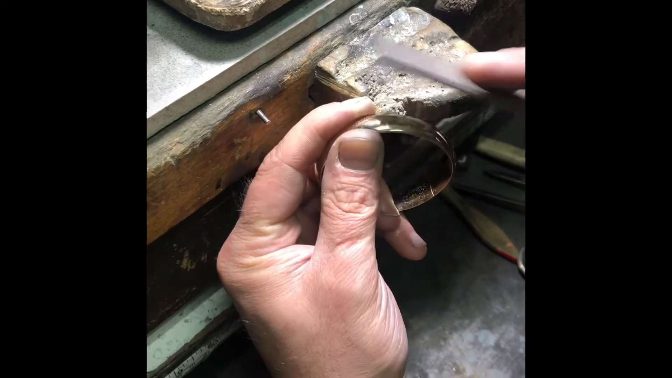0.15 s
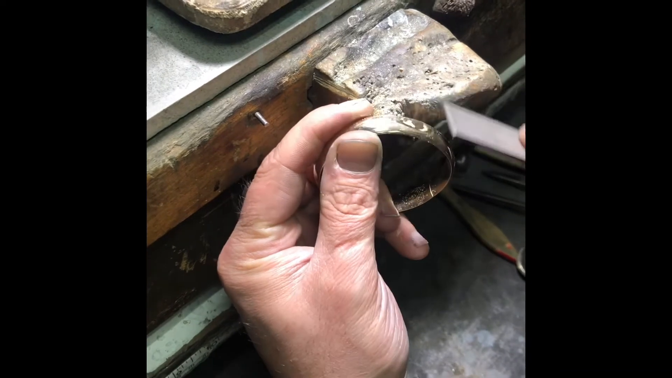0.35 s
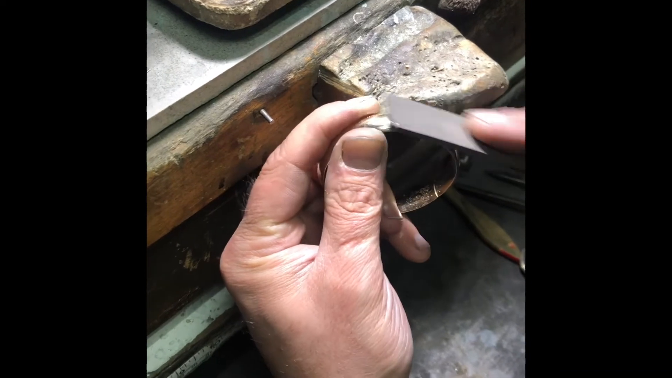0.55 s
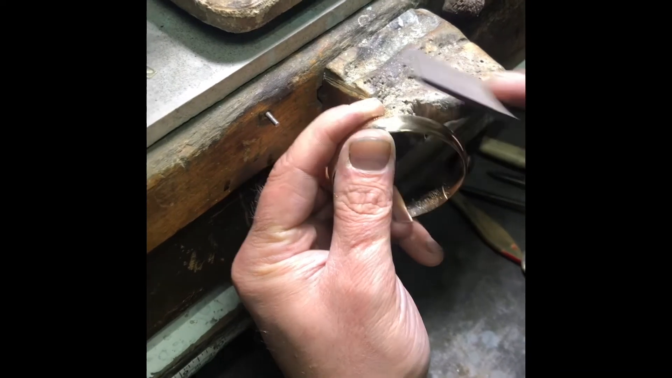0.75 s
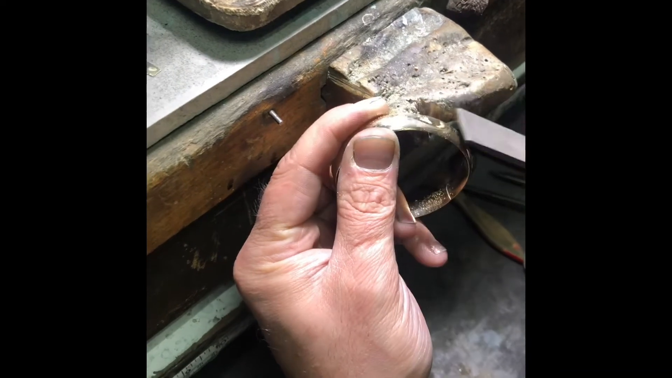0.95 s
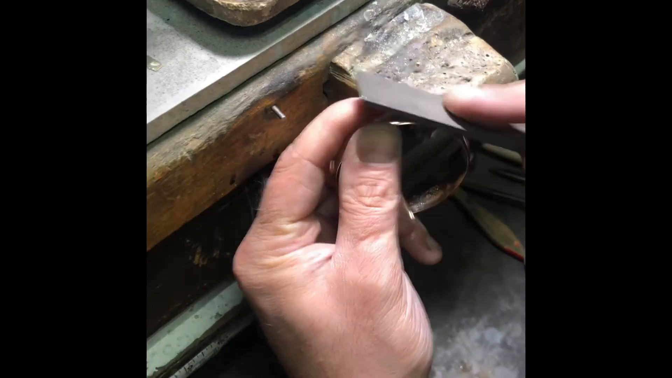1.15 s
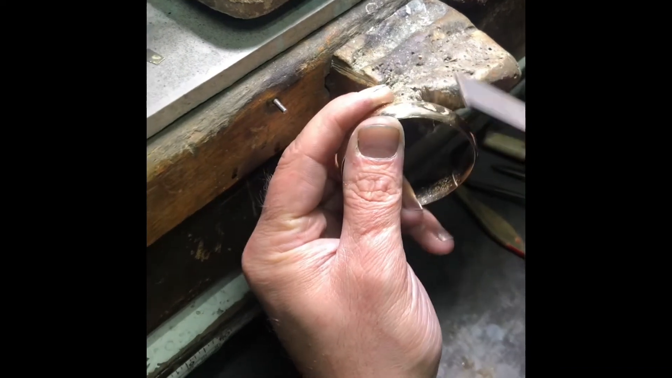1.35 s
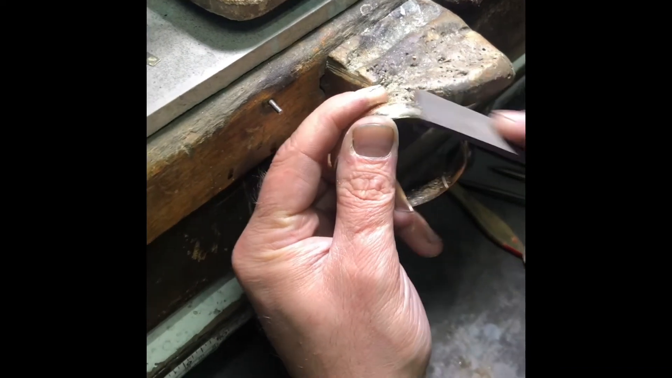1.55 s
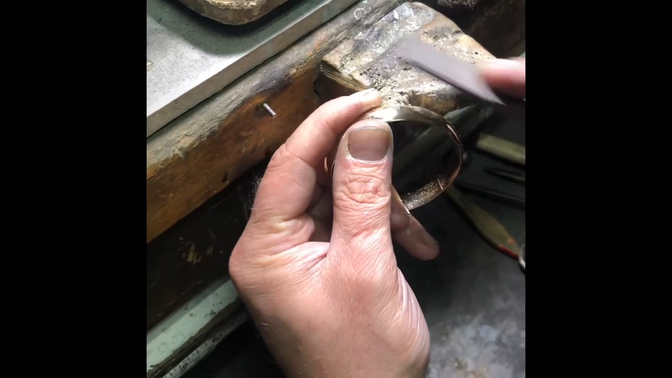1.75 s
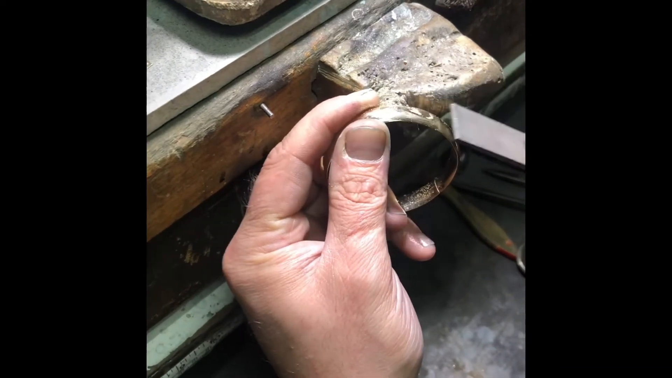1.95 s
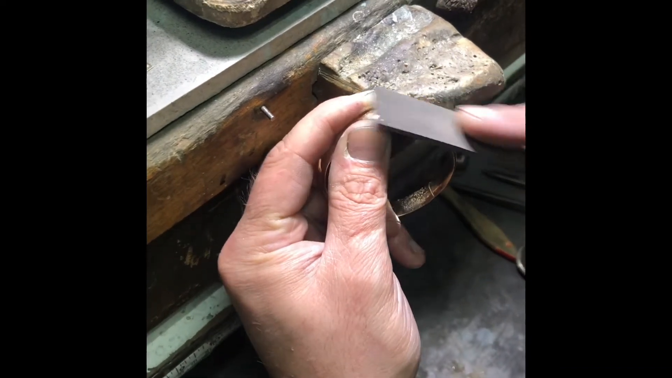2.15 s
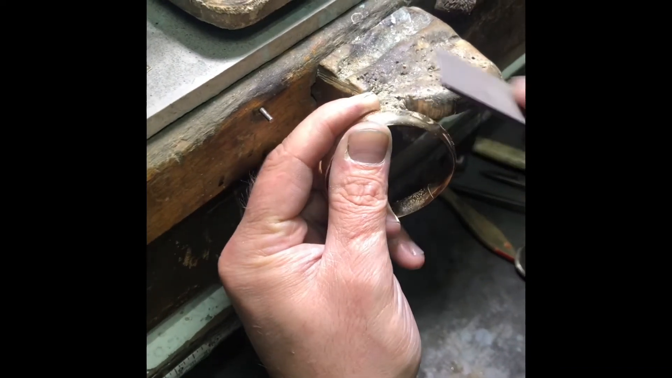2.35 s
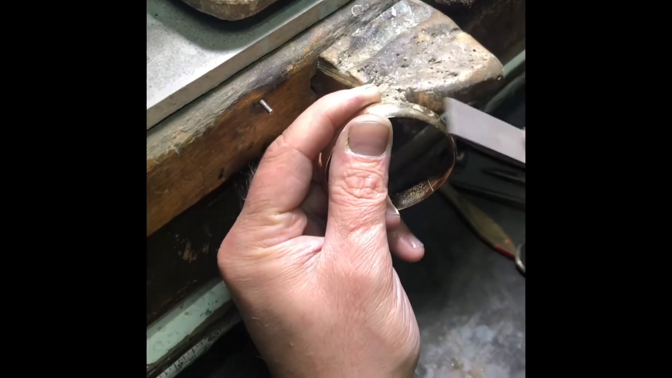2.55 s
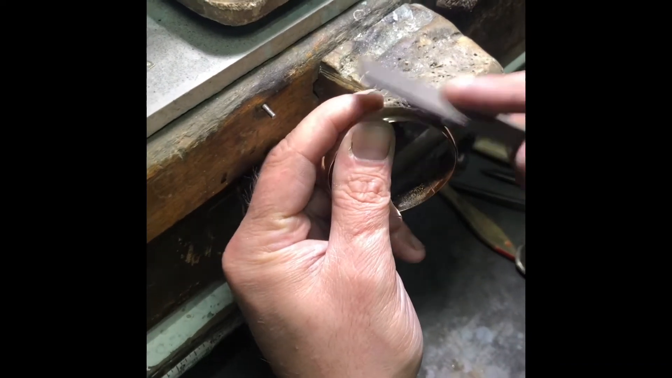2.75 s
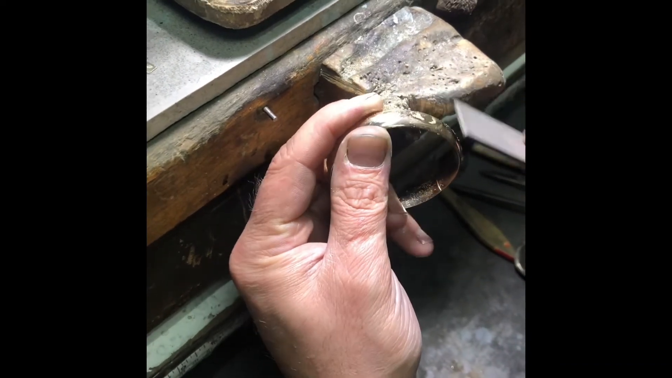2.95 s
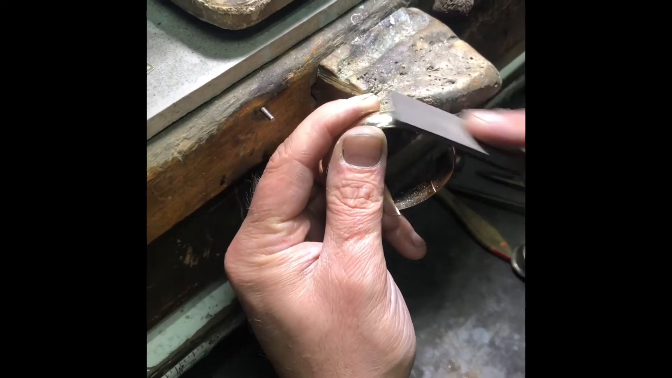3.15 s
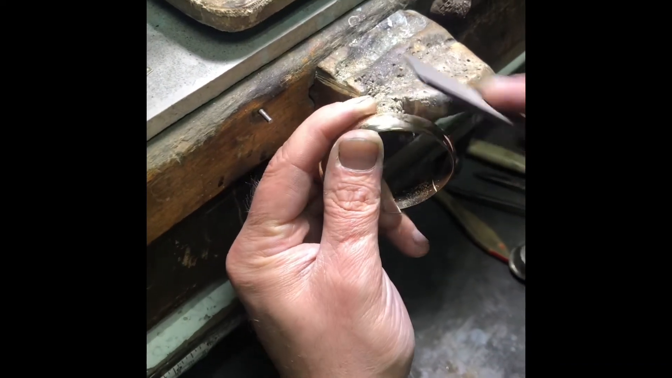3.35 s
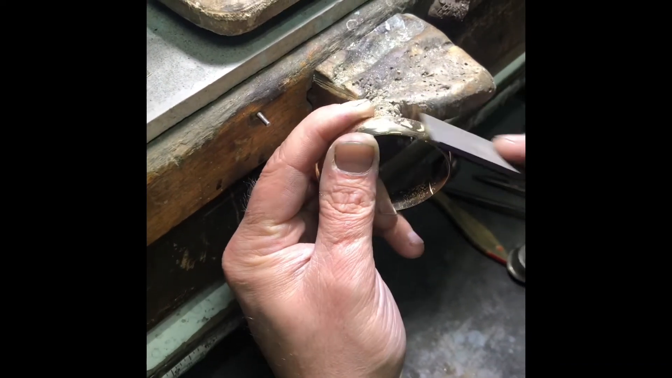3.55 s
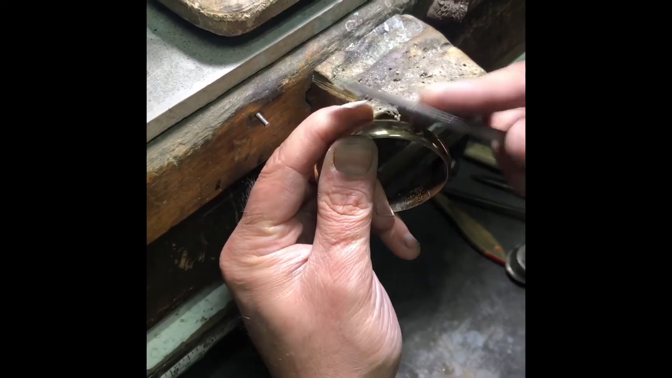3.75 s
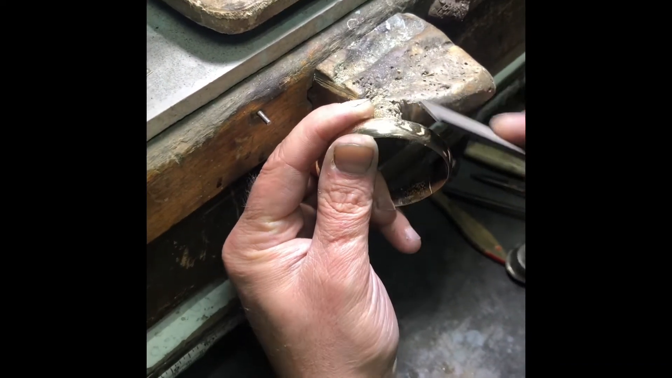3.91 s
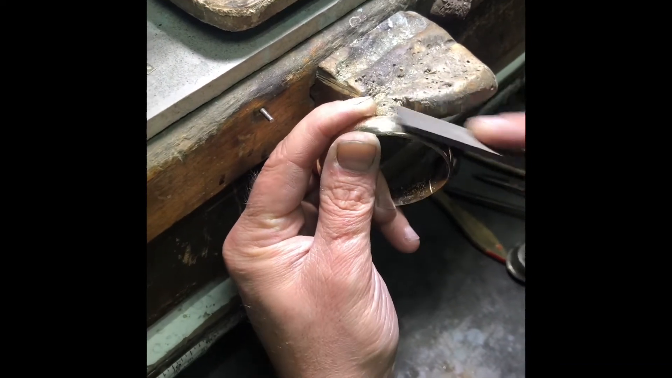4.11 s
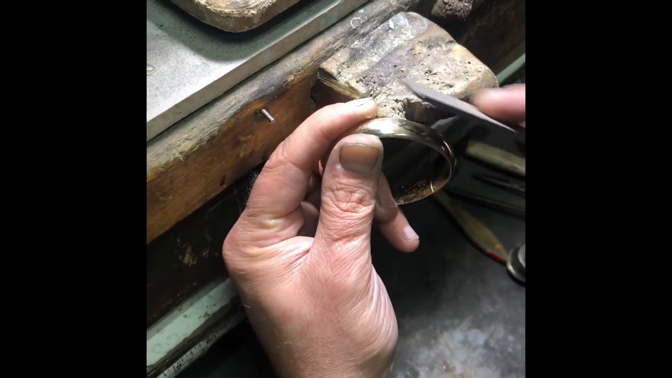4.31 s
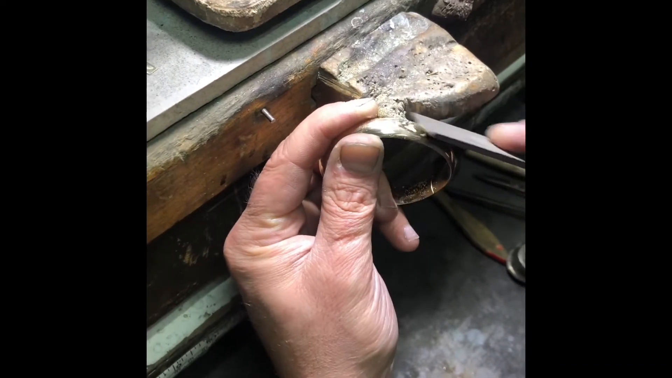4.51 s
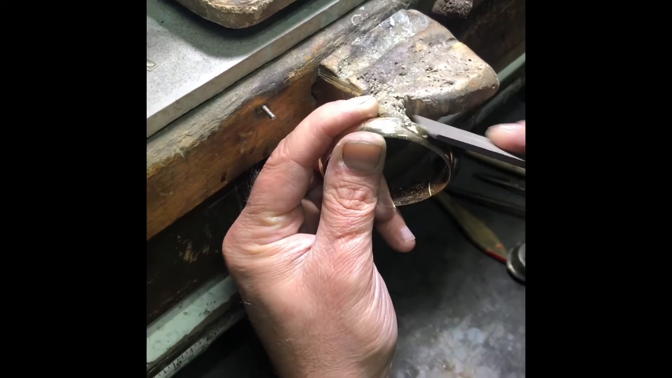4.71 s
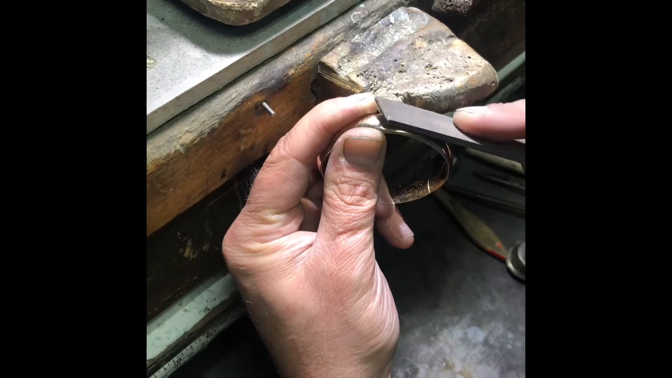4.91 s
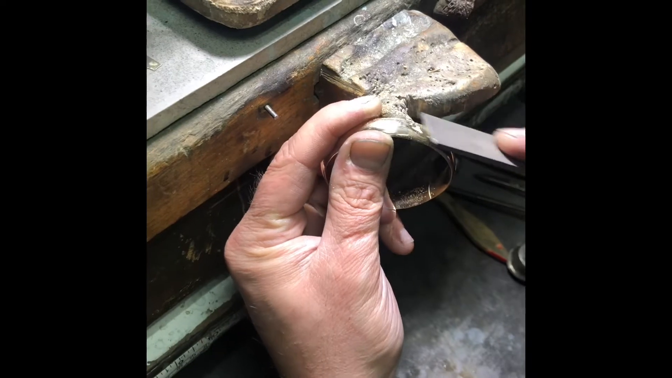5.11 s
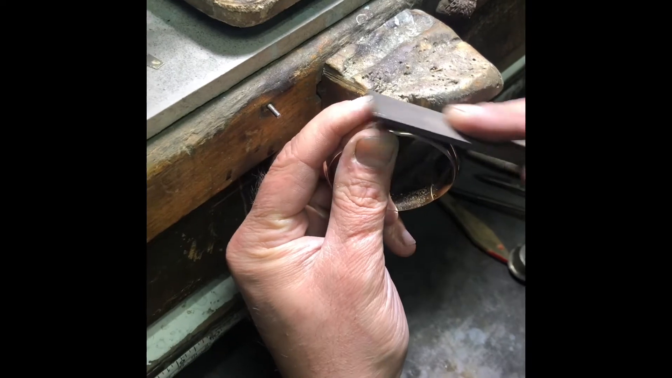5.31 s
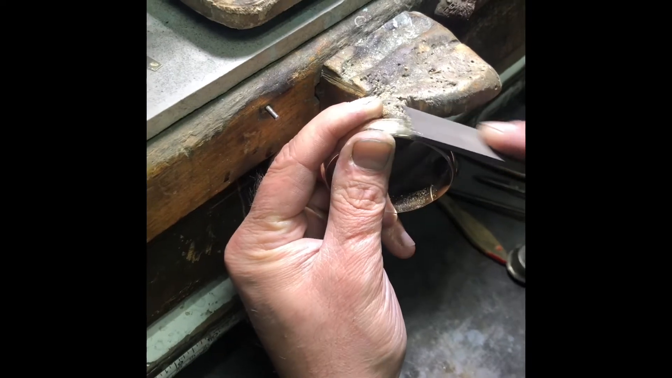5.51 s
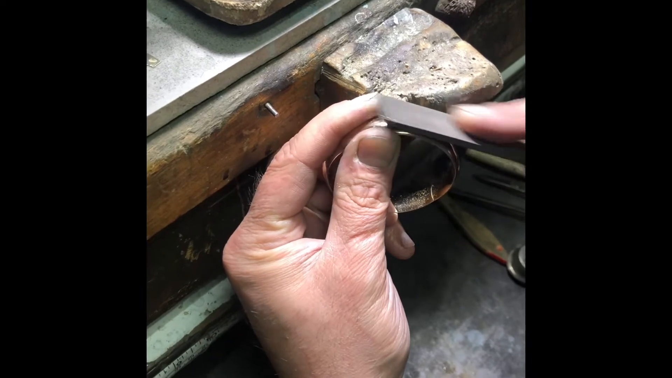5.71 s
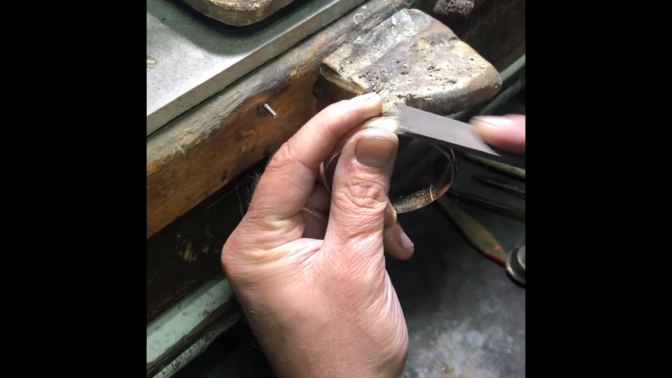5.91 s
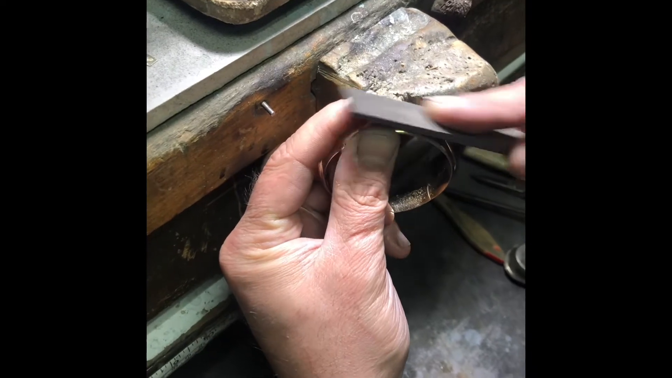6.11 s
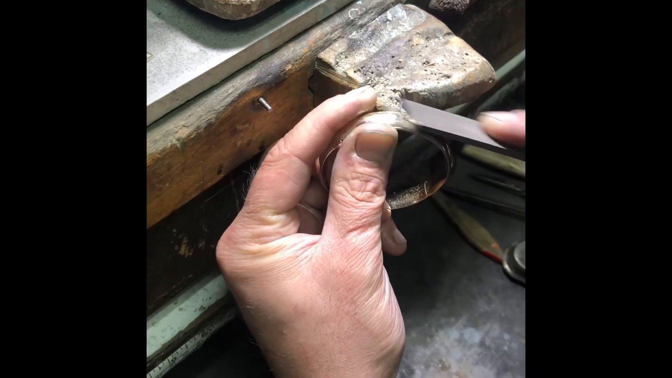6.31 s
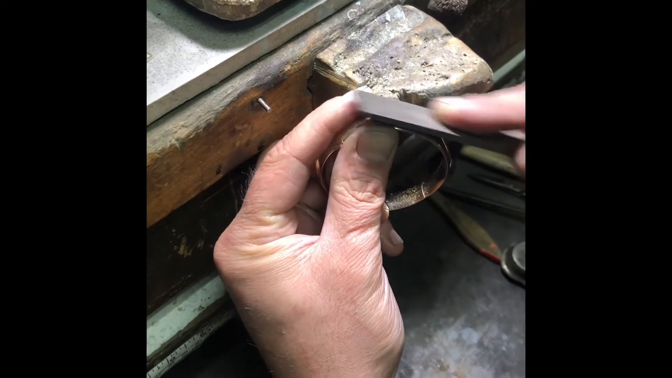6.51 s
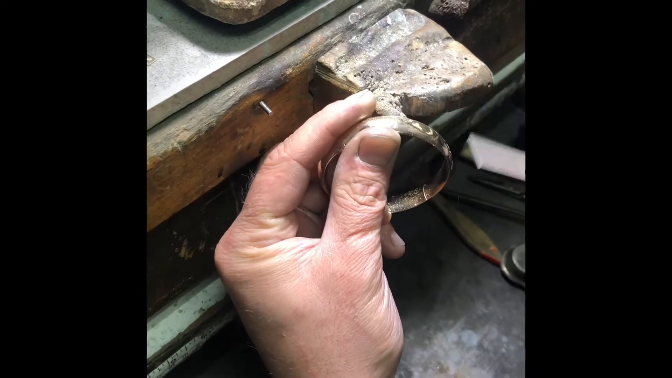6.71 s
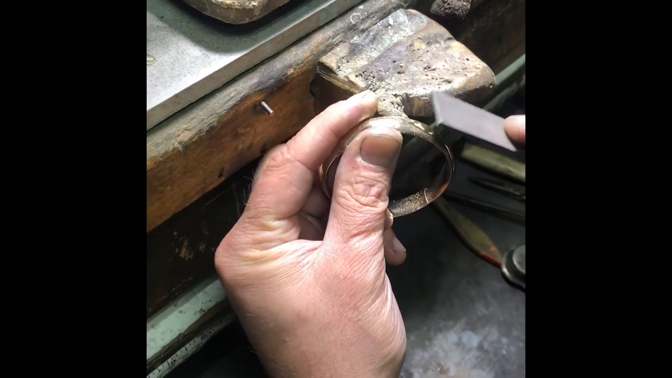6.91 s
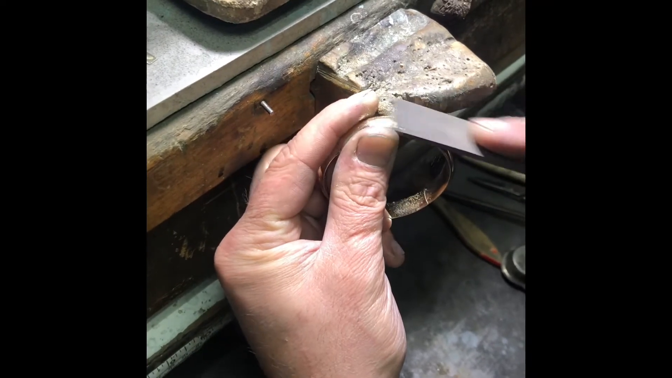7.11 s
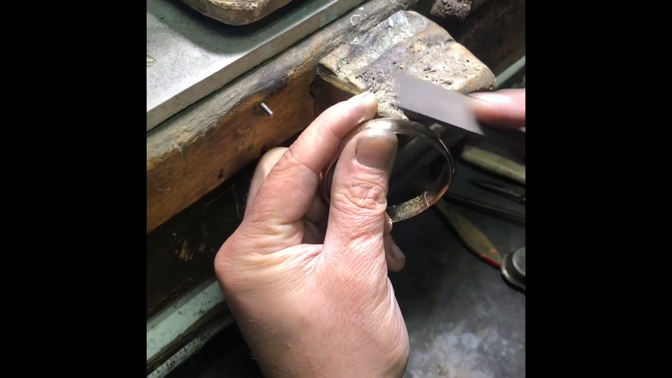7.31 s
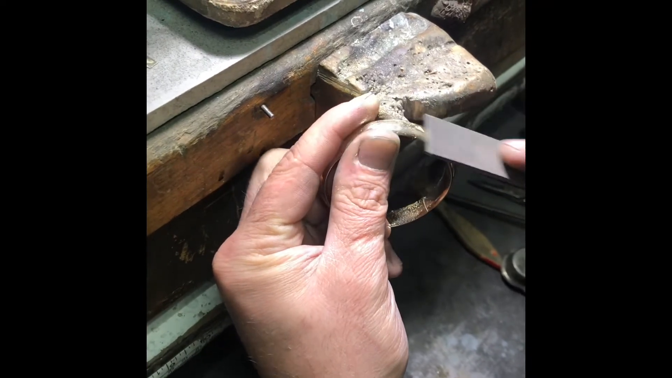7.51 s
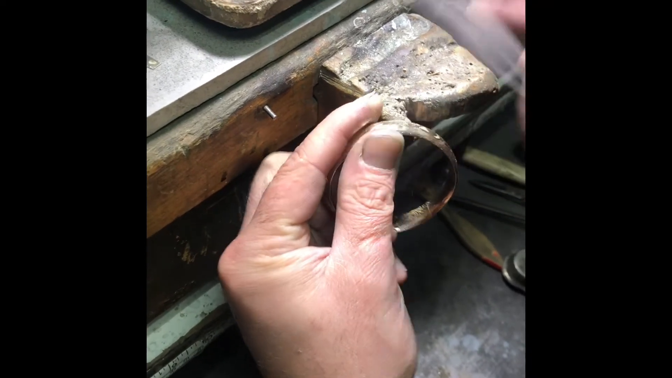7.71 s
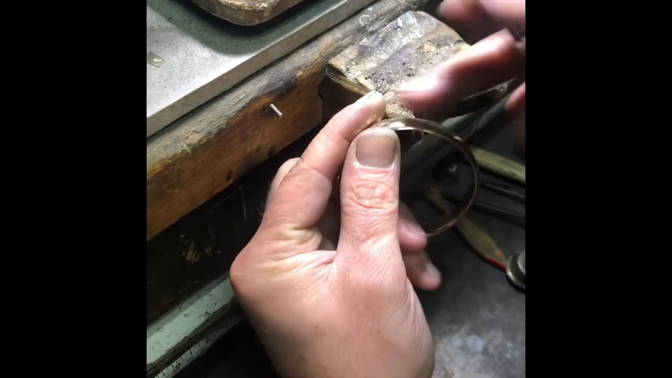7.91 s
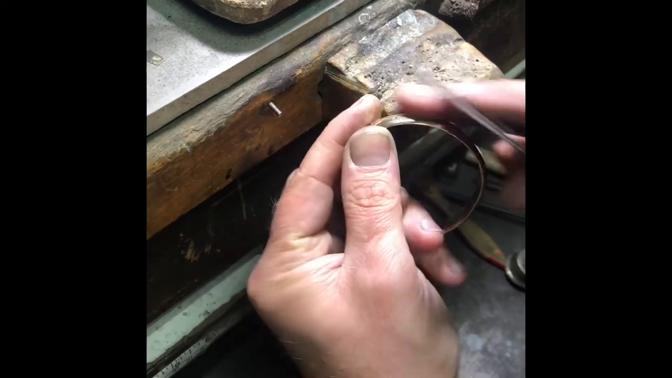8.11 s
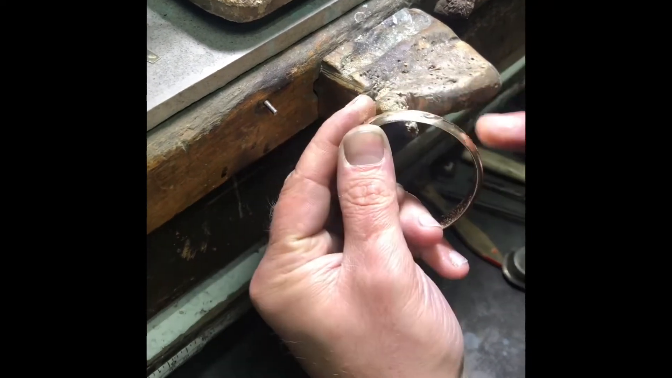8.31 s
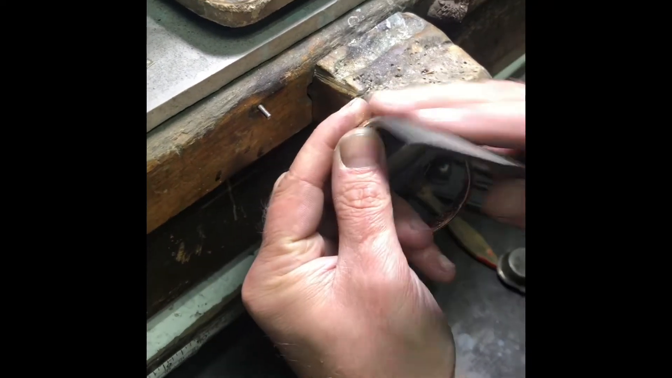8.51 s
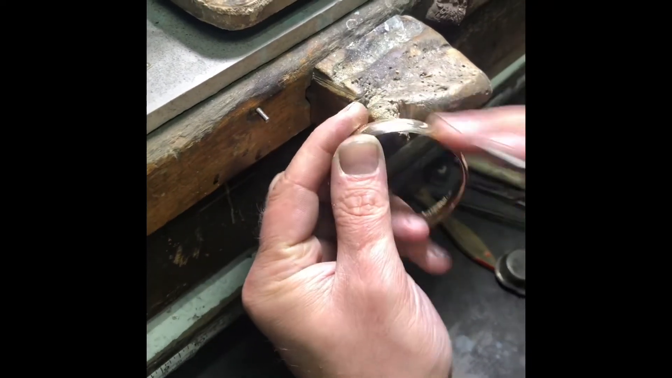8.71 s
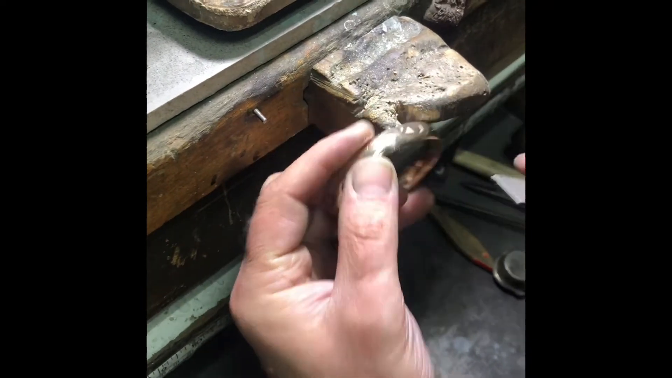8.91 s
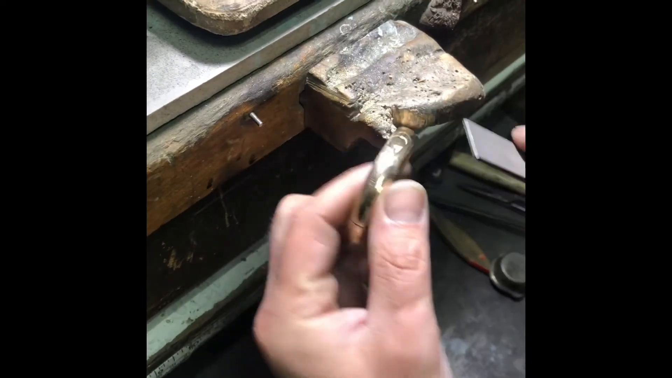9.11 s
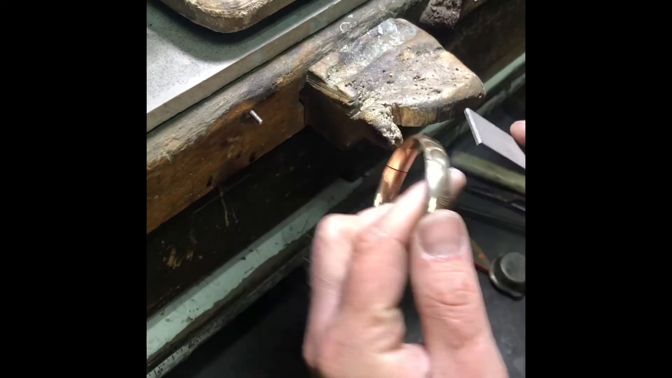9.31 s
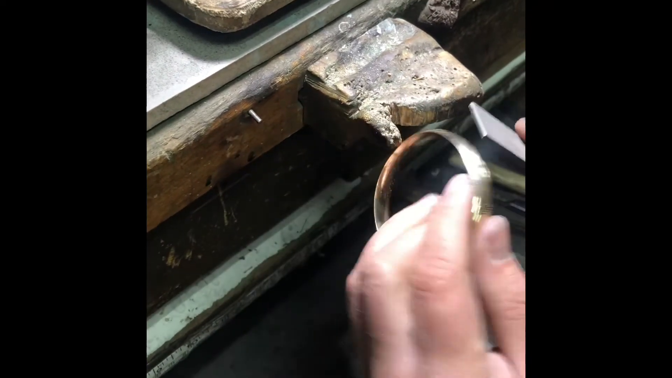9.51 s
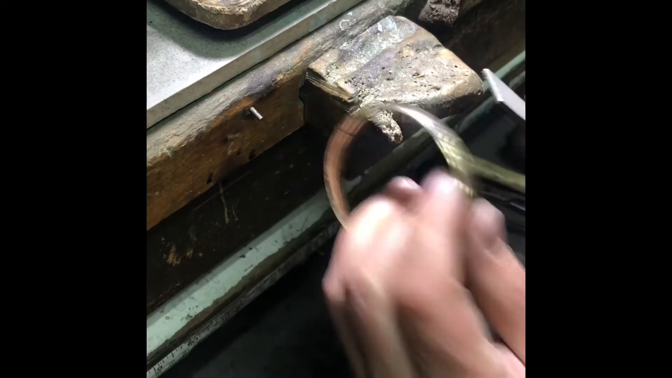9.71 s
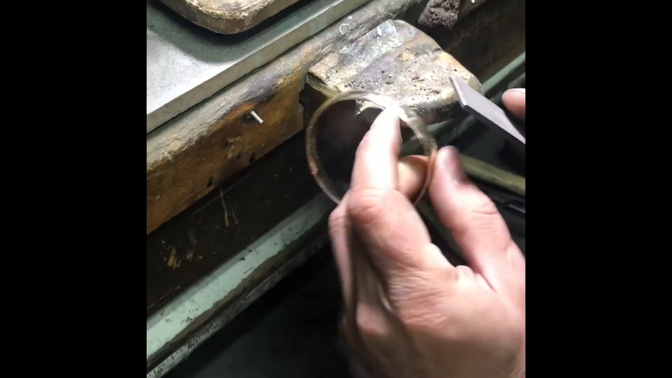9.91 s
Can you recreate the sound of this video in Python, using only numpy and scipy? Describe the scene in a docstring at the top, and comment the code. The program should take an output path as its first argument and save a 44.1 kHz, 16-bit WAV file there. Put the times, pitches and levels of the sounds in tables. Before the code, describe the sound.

A steel file rasps a hollow gold bangle braced on a wooden bench pin. Eight separate strokes, about two a second, each begin with a metallic tick, with woody knocks between them. A rapid to-and-fro run follows, then two last strokes, soft finger wipes and a few taps as the bangle is turned. Close microphone, small room with short decay and a faint low hum.

```python
"""In a small workshop with a low hum, a steel hand file rasps over a hollow gold bangle on a wooden bench pin.
Single strokes, a quick run to and fro and two more strokes: tooth pulses and torn chips excite resonances.
The file lands with a tick and the bangle knocks on the pin: short bursts of force ring the same bodies.
At the end a finger wipes the metal, a soft coloured noise, and the bangle is turned with a few taps.
Bending waves in the bench spread each contact into a falling chirp, and the room adds a short decay."""
import sys
import numpy as np
from scipy import signal
from scipy.fft import rfft, irfft, next_fast_len
from scipy.io import wavfile
from scipy.ndimage import map_coordinates

SR = 44100
rng = np.random.default_rng(int(sys.argv[2]) if len(sys.argv) > 2 else 0)


def dump_mix(stems):
    """Bounce the given channels to the path in sys.argv[1] as a 16-bit WAV at rate SR."""
    frames = np.atleast_2d(stems).T  # one column per channel
    limited = np.clip(frames, -1, 1)  # hard clip at full scale
    pcm = np.round(limited * 32767).astype(np.int16)
    wavfile.write(sys.argv[1], SR, pcm)


N = 438783
TIME = np.arange(N) / SR
RESPONSE_SAMPLES = 4096
HZ = np.fft.rfftfreq(RESPONSE_SAMPLES, 1 / SR) + 1  # 1 Hz up, clear of zero
TOP_HZ = 15900  # upper limit of the sound's band

# Spectrum of the workshop's air. Each row: frequency in Hz, relative density in dB per Hz.
AIR_SPECTRUM = [(22, -29), (48, -15), (85, -10), (125, -1), (200, -8.5), (370, -9), (680, -20.5),
                (1800, -25.5), (3000, -31.5), (7000, -37), (11500, -37), (13000, -30), (16000, -33.5)]
# Partials of the machine hum. Each row: frequency in Hz, rms level in dB.
HUM_PARTIALS = [(58.5, -70), (120.5, -67.5), (358, -72)]
# Decay of the room. Each row: frequency in Hz, time to fall by 60 dB in seconds.
ROOM_DECAY = [(150, 0.42), (700, 0.32), (2000, 0.19), (5000, 0.22), (13000, 0.21)]
# Resonances of bench, pin, bangle and file. Each row: frequency in Hz, width in Hz, relative level in dB.
RESONANCES = [(166.3, 31.4, 2), (237.8, 62, 1.5), (332, 16, -9), (468.3, 78, -4.5), (597, 74, -5.5),
              (668.4, 39, -3.5), (742.3, 50, 1.5), (994, 150, -2), (1104, 104, -4), (1371, 51, -8),
              (1449, 103, -6), (1807, 360, -11), (2075, 134, -3.5), (2150, 59, -8.5), (2310, 170, -6),
              (2448, 199, -4), (2764, 170, -17), (4020, 88, -22), (5830, 450, -23), (7730, 840, -26.5),
              (10130, 250, -27), (13580, 350, -16), (13500, 450, -28), (15300, 510, -35)]
# Broad response under the resonances. Each row: frequency in Hz, relative level in dB.
BROAD_RESPONSE = [(50, -27), (110, -74), (400, -12), (850, -13.5), (1600, -19), (2700, -24), (3300, -20.5),
                  (4800, -26.5), (7300, -28.5), (8800, -31.5), (12000, -25.5), (15000, -22)]
# Frequencies in Hz that part the response into bench top, pin with bangle, metal ring and top sizzle.
BAND_EDGES_HZ = (350, 2900, 11500)
# Dry ticks of the bench wood under load. Each row: start in seconds, impulse level in dB.
WOOD_TICKS = [(0.807, -35), (1.116, -11)]
# Colour of these ticks. Each row: frequency in Hz, relative level in dB.
TICK_COLOUR = [(120, 5), (450, 2), (2600, -2.5), (3600, -13), (6000, -21), (9000, -31), (15000, -36)]
# A finger wipes the metal. Each row: start in seconds, length in seconds, level in dB before a common trim.
FINGER_WIPES = [(7.93, 0.15, -51.5), (8.35, 0.13, -54), (8.51, 0.11, -54.5)]
# Spectrum of skin sliding on metal. Each row: frequency in Hz, relative density in dB per Hz.
SKIN_SPECTRUM = [(400, -17), (950, -3.5), (1500, -9.5), (2400, -5.5), (4200, -18.5), (7000, -11),
                 (11000, -10.5), (15000, -4.5)]
# The bangle drags on the pin as it is turned. Each row: start in seconds, length in seconds, level in dB.
PIN_DRAGS = [(8.86, 0.21, -76), (9.07, 0.36, -68), (9.435, 0.026, -51)]
# Duller knocks of the bangle on the pin. Each row: start in seconds, level in dB before band trims,
# relative thud in dB, relative brightness in dB, centre of the knock in Hz.
PIN_KNOCKS = [(0.003, -42, 1.5, -20, 706), (0.5315, -31.5, -2, -16, 1140), (1.043, -29.5, 3, -18, 660),
              (1.565, -33.5, -0.5, -17, 750), (2.599, -26.5, -5.5, -30, 1370), (2.63, -36, 0.5, -12.5, 700),
              (3.12, -23, -8.5, -25, 1020), (3.635, -38.5, 1.5, -18, 600), (3.808, -49, 4.5, -8, 1670),
              (5.633, -32, -9, -15, 1600), (6.646, -48, -4, -15, 1150), (7.498, -40.5, -13, -3, 980),
              (8.833, -54, -5, -17, 980), (9.105, -57.5, 9, -1.5, 750), (9.414, -47.5, -5, -14, 1200),
              (9.915, -46.5, -13, -6.5, 1490)]
# Hard metal contacts, the file landing or the bangle tapped. Each row: start in seconds, level in dB before
# band trims, relative thud in dB, relative brightness in dB, centre of the knock in Hz.
METAL_TAPS = [(0.37, -37.5, -1, -17, 1700), (0.89, -39, -1, -12, 1100), (1.372, -42, -6, -13, 1100),
              (1.922, -40, 3.5, -14.5, 1110), (2.482, -35, 4.5, -8, 2060), (2.955, -37.5, -8, -20, 1070),
              (3.439, -39, 0, -17, 1130), (3.938, -41, -2, -25, 2500), (4.36, -40, -2.5, -12, 2450),
              (6.908, -36.5, 4.5, -4.5, 1750), (7.404, -35, 4.5, -3, 2100), (8.45, -41.5, -5.5, -25, 1910),
              (8.72, -37.5, -16, -0.5, 1750), (8.965, -45, -2, -7, 1100), (9.258, -43.5, -11, -35, 2060),
              (9.454, -33, -14.5, -15, 2050), (9.704, -32.5, -8.5, -0.5, 1480)]
# Strokes of the file. Each row: start in seconds, length until the hand lets go in seconds, level in dB
# before band trims, crest as a share of the length, relative bench rumble in dB, relative sizzle in dB.
FILE_STROKES = [ (0.371, 0.18, -37, 0.42, -5, -13.5), (0.89, 0.2, -36, 0.53, -5.5, -16),
                (1.38, 0.19, -36.5, 0.58, -11.5, -15), (1.923, 0.18, -36.5, 0.7, -10.5, -17),
                (2.484, 0.15, -38.5, 0.48, -9, -12), (2.956, 0.2, -37.5, 0.56, -7, -13),
                (3.44, 0.18, -37.5, 0.7, -5.5, -9), (3.941, 0.16, -37.5, 0.65, -5.5, -7),
                (4.363, 0.15, -42, 0.61, -5.5, -8), (4.531, 0.12, -43, 0.45, -7.5, -10.5),
                (4.674, 0.14, -40, 0.49, -5.5, -9), (4.84, 0.12, -40.5, 0.45, -4.5, -13),
                (5.001, 0.16, -38, 0.62, -5, -12), (5.197, 0.13, -37.5, 0.27, -6.5, -14),
                (5.371, 0.175, -37.5, 0.47, -6.5, -12), (5.567, 0.15, -37.5, 0.44, -9.5, -10.5),
                (5.743, 0.21, -36.5, 0.63, -6.5, -12), (5.977, 0.17, -37.5, 0.57, -9, -10),
                (6.177, 0.18, -39, 0.6, -9, -7), (6.377, 0.15, -37, 0.79, -10, -8),
                (6.921, 0.2, -39.5, 0.68, -7, -11.5), (7.405, 0.12, -37.5, 0.62, -10.5, -12), ]
# Rumble, rasp, hiss and sizzle under effort; a harder push is brighter. Each row: dB gained per dB of effort,
# time to fall by 60 dB in seconds as the hand lets go.
EFFORT_RESPONSE = [(0.15, 0.17), (0.65, 0.083), (0.98, 0.24), (1.36, 0.2)]


def amp(db):
    """Amplitude ratio from decibels: 20 dB are a factor of ten."""
    return 10 ** (np.asarray(db) / 20)


def unit(x):
    """Normalisation to an rms of 1."""
    return x / np.sqrt(np.mean(x ** 2) + 1e-20)


def along(points, hz):
    """Interpolation of (Hz, value) points along logarithmic frequency."""
    point_hz, values = np.transpose(points)
    return np.interp(np.log(hz + 1), np.log(point_hz), values)


def wobble(rate, t=TIME):
    """Smooth random fluctuation: a spline through normal knots, rate of them per unit of t."""
    position = (t - t[0]) * rate
    return map_coordinates(rng.standard_normal(int(position[-1]) + 4), [position])


def filtered(x, response):
    """Linear filtering: the spectrum is multiplied by a response of frequency."""
    size = next_fast_len(N + RESPONSE_SAMPLES)
    return irfft(rfft(x, size) * response(np.fft.rfftfreq(size, 1 / SR)), size)[:N]


def noise(spectrum):
    """Coloured noise of rms 1: white noise shaped by a spectral density."""
    return unit(filtered(rng.standard_normal(N), lambda hz: amp(along(spectrum, hz))))


def arch(t, length, crest=0.42):
    """Effort of one hand movement, t after its start: a sine arch from 0 up to 1 at the crest and back."""
    return np.sin(np.pi * np.interp(t / length, [0, np.clip(crest, .1, .9), 1], [0, .5, 1]))


def swells(table):
    """Amplitude envelope of a series of light rubs, one arch each."""
    return sum(amp(db) * arch(TIME - start, length) for start, length, db in table)


def workshop(air_db):
    """Steady broadband air noise, and machine hum as sine partials whose phases wander slowly."""
    hum = np.zeros(N)
    for hz, db in HUM_PARTIALS:
        phase = 2 * np.pi * hz * TIME + 0.97 * wobble(5)
        hum += amp(db) * np.sqrt(2) * np.sin(phase)
    return hum + amp(air_db) * noise(AIR_SPECTRUM)


def room(x, wet_db, treble_db):
    """Reverberation: noise decaying at each frequency's own rate; the treble is weak, the bass lasts longest."""
    hz, t, cells = signal.stft(rng.standard_normal(SR // 2), SR, nperseg=256)
    decay = amp(-60 * t / along(ROOM_DECAY, hz)[:, None])
    colour = amp(along([(2000, 0.017), (6000, treble_db)], hz))[:, None]
    decay *= colour / np.linalg.norm(decay, axis=1, keepdims=True)
    tail = signal.istft(cells * decay, SR, nperseg=256)[1] / np.sqrt(128)
    late_tail = np.pad(tail, (SR // 200, 0))  # the answer sets in after 5 ms
    return amp(wet_db) * signal.oaconvolve(x, late_tail)[:N]


def ringing(gain):
    """Minimum phase: the causal impulse response, of energy 1, with this gain on the HZ grid."""
    cepstrum = irfft(np.log(np.maximum(gain / gain.max(), 1e-5)))
    half = RESPONSE_SAMPLES // 2
    cepstrum[1:half] *= 2  # folding the cepstrum forward makes the response causal
    cepstrum[half + 1:] = 0
    response = irfft(np.exp(rfft(cepstrum)))
    return response / np.linalg.norm(response)


def body_bands():
    """Modal response: resonance peaks over a broad floor, parted into bench, pin, metal ring and sizzle."""
    peaks = sum((amp(db) / (1 + (2 * (HZ - hz) / width) ** 2)) ** 2 for hz, width, db in RESONANCES)
    gain = np.sqrt(peaks + amp(along(BROAD_RESPONSE, HZ)) ** 2)
    below = [1 / (1 + (HZ / edge) ** 28) for edge in BAND_EDGES_HZ]
    power_shares = np.abs(np.diff(below, axis=0, prepend=0, append=1))
    return gain * np.sqrt(power_shares)


def touch_point(depth_db, spacing_hz):
    """Modal excitation: each point of contact favours other modes, most of all in the treble."""
    return amp(depth_db * wobble(1 / spacing_hz, HZ) * HZ / (HZ + 2000))


def through_bench(x, lag_s):
    """Dispersion: bending waves lag as 1 / sqrt(f), so a tick chirps downward from its top."""
    khz = 1000  # lag_s is the travel time here; that of TOP_HZ is taken off at every pitch
    cycles = lambda hz: lag_s * (2 * np.sqrt(khz * hz) - hz * np.sqrt(khz / TOP_HZ))
    return filtered(x, lambda hz: np.exp(-2j * np.pi * cycles(hz)))


def ticks():
    """Impulsive excitation: a single sharp slip in the wood with nothing to ring."""
    pushes = np.zeros(N)
    for start, db in WOOD_TICKS:
        pushes[round(start * SR)] = amp(db)
    return signal.oaconvolve(pushes, ringing(amp(along(TICK_COLOUR, HZ))))[:N]


def wiping(trim_db):
    """Light friction: skin brushes the filings off with a soft hiss."""
    return amp(trim_db) * swells(FINGER_WIPES) * noise(SKIN_SPECTRUM)


def turning(grit_db):
    """Uneven friction: small slips of gold on wood excite pin and metal."""
    bench, pin, metal, top = body_bands()
    slips = rng.standard_normal(N) * amp(grit_db * wobble(150))
    return swells(PIN_DRAGS) * unit(signal.oaconvolve(slips, ringing(pin + metal))[:N])


def contacts(table, trims_db, hardness, ting_share, chatter_db, thud_t60, chatter_t60, ting_t60):
    """Impact: a push and brief chatter of two surfaces; brightness lifts the sizzle and, in part, the ting."""
    out = np.zeros(N + 2 * RESPONSE_SAMPLES)
    t = np.arange(RESPONSE_SAMPLES) / SR
    bench, pin, metal, top = body_bands()
    t60s = (thud_t60, chatter_t60, ting_t60, ting_t60)
    for start, level_db, thud_db, bright_db, centre_hz in table:
        pitch = HZ / centre_hz
        # a harder contact is shorter and reaches higher
        focus = pitch / (pitch + .5) / (1 + (pitch / hardness) ** 4)
        colours = np.array([bench, pin * focus, metal, top]) * touch_point(depth_db=1.5, spacing_hz=299)
        bands_db = (thud_db, 0, ting_share * bright_db, bright_db)
        first = max(round(start * SR), 0)
        for colour, db, trim_db, t60 in zip(colours, bands_db, trims_db, t60s):
            force = amp(chatter_db - 60 * t / t60) * rng.standard_normal(RESPONSE_SAMPLES)
            force[0] += 1  # the push
            blow = signal.fftconvolve(force, ringing(colour))[:RESPONSE_SAMPLES]
            gain = amp(level_db + db + trim_db) / np.linalg.norm(blow)
            out[first:first + RESPONSE_SAMPLES] += gain * blow
    return out[:N]


def teeth(t, effort, tooth_hz, end_speed, size_db):
    """Periodic excitation: one pulse per tooth, at a rate that rises and falls with the hand's speed."""
    speed = end_speed + (1 - end_speed) * effort
    rate = tooth_hz * speed * np.exp(.12 * rng.standard_normal() + 0.01615 * wobble(296.2, t))
    passed = np.cumsum(rate) / SR
    nearest = np.round(passed)
    offset = (passed - nearest) * SR / rate  # samples from the nearest tooth
    size = amp(size_db * rng.standard_normal(len(t)))[nearest.astype(int)]
    pulses = size * np.sinc(offset) * np.exp(-(offset / 6) ** 2)
    return unit(pulses - pulses.mean())


def sliding(force, band):
    """Moving excitation: the colour of one band drifts as the contact moves along the file."""
    ends = []
    for _ in range(2):
        colour = band * touch_point(depth_db=4.5, spacing_hz=129.9)
        ends.append(signal.fftconvolve(force, ringing(colour))[:len(force)])
    travel = np.linspace(0, 1, len(force))
    return unit((1 - travel) * ends[0] + travel * ends[1])


def filing(torn_share, grit_db, judder_db, trims_db):
    """Forced vibration: tooth pulses and torn chips drive the resonances; effort sets level and brightness."""
    bite_s, drag_share = 0.013, 0.07  # the teeth bite; the effort starts from and returns to a light drag
    out, bands = np.zeros(N), body_bands()
    for start, length, level_db, crest, rumble_db, sizzle_db in FILE_STROKES:
        on = (TIME > start) & (TIME < start + 2 * length)
        t = TIME[on] - start
        effort = drag_share + (1 - drag_share) * arch(t, length, crest)
        chips = unit(rng.standard_normal(len(t)) * amp(grit_db * wobble(1500, t)))
        pulses = teeth(t, effort, tooth_hz=1142.4, end_speed=.6, size_db=4.0)
        force = np.sqrt(torn_share) * chips + np.sqrt(1 - torn_share) * pulses
        force *= amp(judder_db * wobble(129.7, t))  # the pressure is never even
        bands_db = (rumble_db, 0, 0, sizzle_db)
        for band, db, trim_db, (growth, t60) in zip(bands, bands_db, trims_db, EFFORT_RESPONSE):
            release = amp(-60 * np.maximum(t - length, 0) / t60)
            contact = np.minimum(t / bite_s, 1) * release
            out[on] += amp(level_db + db + trim_db) * contact * effort ** growth * sliding(force, band)
    return out


def scene():
    """Superposition: strokes and contacts travel through the bench, and the room answers."""
    # trims run from bench to sizzle
    rasp = filing(torn_share=0.81, grit_db=2.0, judder_db=1.5, trims_db=[0.2, -0.04, -9.5, 3.5])
    taps = contacts(METAL_TAPS, trims_db=[25.8, 28.73, 22.5, 28.6], hardness=1.74, ting_share=0.22,
                    chatter_db=-19, thud_t60=0.028, chatter_t60=0.029, ting_t60=0.034)
    knocks = contacts(PIN_KNOCKS, trims_db=[23.2, 26.8, 20, 12], hardness=1.25, ting_share=0.93,
                      chatter_db=-18, thud_t60=0.03, chatter_t60=0.047, ting_t60=0.078)
    bench_work = through_bench(rasp + taps + knocks + turning(grit_db=6), lag_s=0.00382)
    work = bench_work + wiping(trim_db=1.5)
    creaks = through_bench(ticks(), lag_s=.003)  # they stay in the wood, so the room does not answer
    answer = room(work, wet_db=-7.5, treble_db=-14.5)
    return (work + answer + creaks + workshop(air_db=-60))[None]


def record(dry):
    """Band limitation: a steep low-pass leaves nothing above TOP_HZ."""
    return filtered(dry[0], lambda hz: hz < TOP_HZ)[None]


dry = scene()
out = record(dry)
dump_mix(out)
```